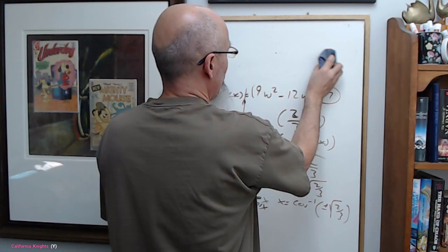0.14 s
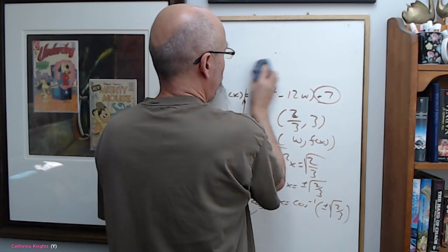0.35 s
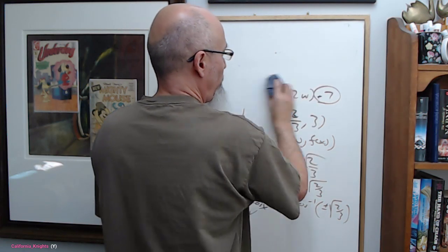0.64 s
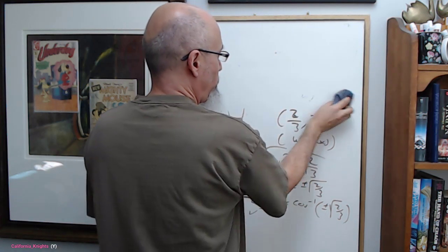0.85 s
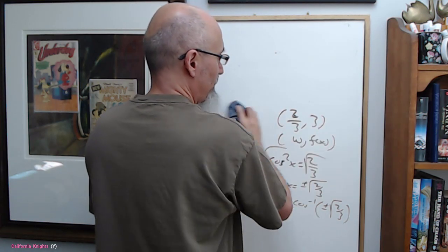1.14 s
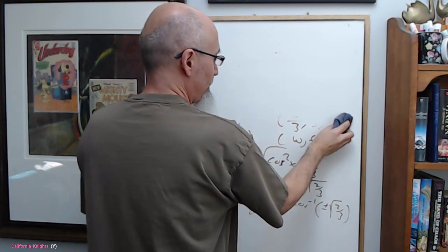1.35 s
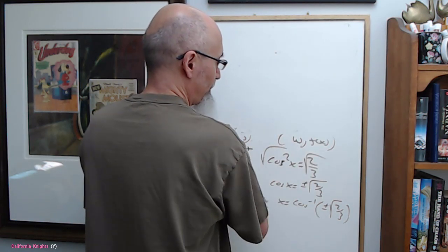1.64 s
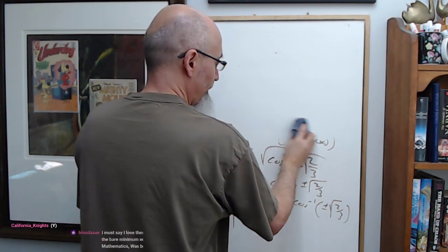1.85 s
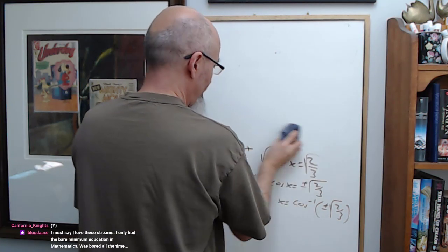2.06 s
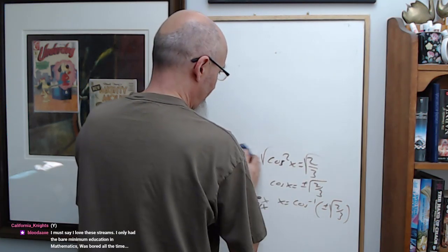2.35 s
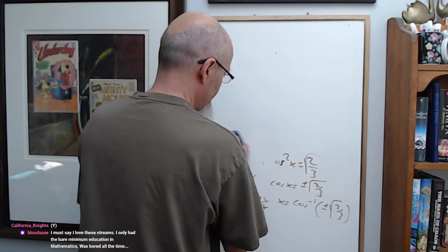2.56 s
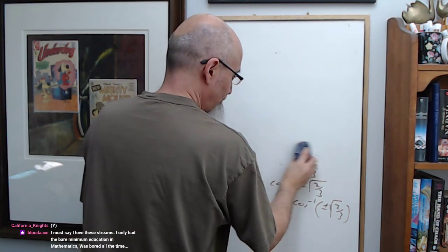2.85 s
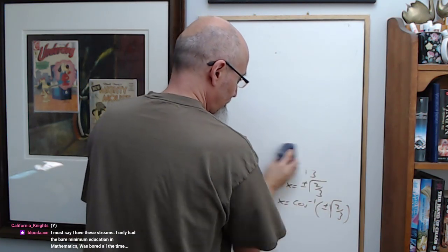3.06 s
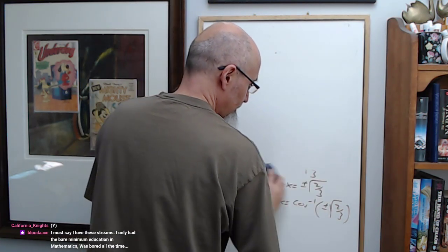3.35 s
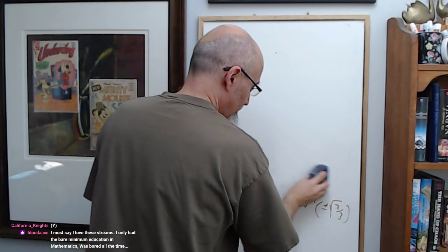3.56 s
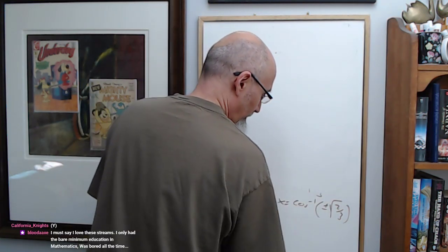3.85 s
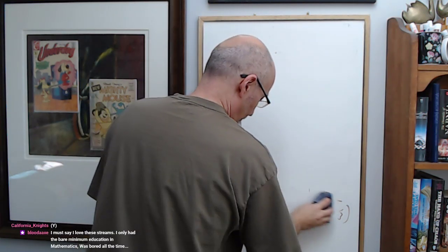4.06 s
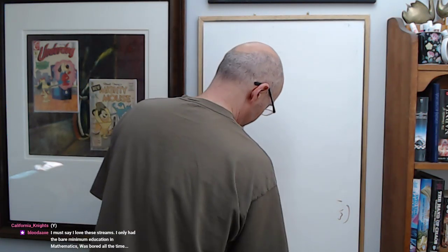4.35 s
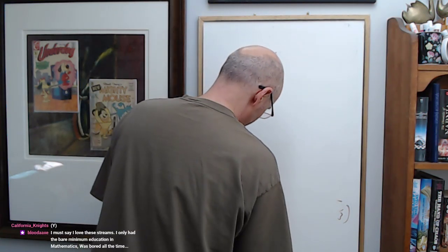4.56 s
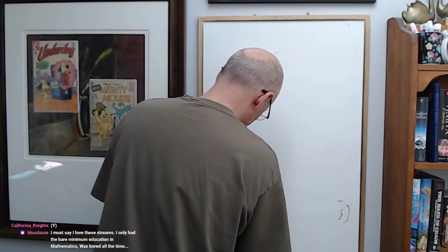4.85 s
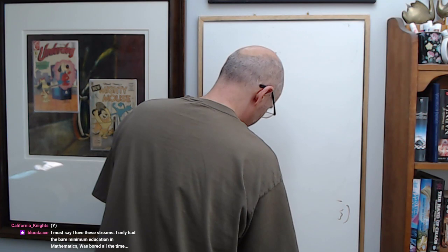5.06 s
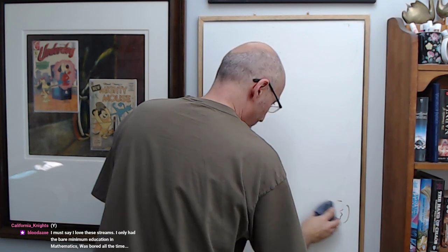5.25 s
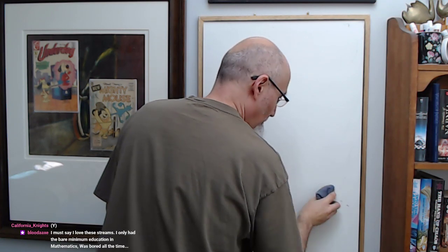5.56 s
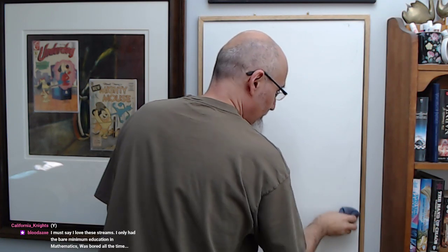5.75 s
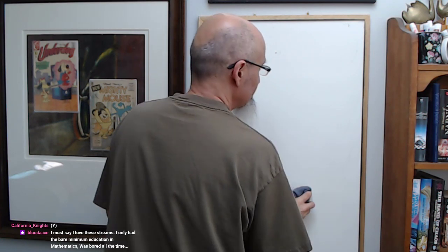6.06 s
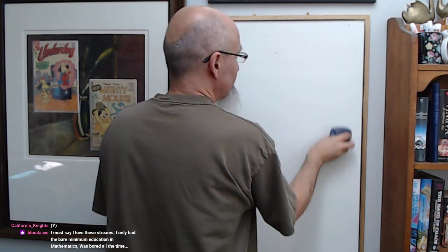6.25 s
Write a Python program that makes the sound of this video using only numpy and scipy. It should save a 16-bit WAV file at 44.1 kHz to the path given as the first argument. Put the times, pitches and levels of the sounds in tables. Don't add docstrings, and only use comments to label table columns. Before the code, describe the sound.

Quick soft wiping strokes hiss over a whiteboard, with hollow board knocks and small ticks, slowing later, while a computer fan blows in a quiet room.

```python
import sys
import numpy as np
from scipy import signal
from scipy.fft import rfft, irfft, next_fast_len
from scipy.io import wavfile
from scipy.ndimage import uniform_filter1d, map_coordinates

SR = 44100
rng = np.random.default_rng(int(sys.argv[2]) if len(sys.argv) > 2 else 0)


def voltage_ratio(level):
    return 10 ** (np.asarray(level, float) / 20)


def output_pcm(signal):
    pcm = np.clip(np.atleast_2d(signal).T, -1, 1) * 32767
    wavfile.write(sys.argv[1], SR, np.round(pcm).astype(np.int16))


N = 282372

# time in seconds, peak in dB, pitch in Hz, t60 in seconds, snap in dB.
TICKS = [
    (.052, -32, 5350, 0.0041, 0),
    (0.6696, -32.5, 5200, 0.0031, 0),
    (1.229, -40, 8140, 0.0036, 6),
    (1.4686, -16.5, 6100, 0.0025, -23),
    (2.796, -31.5, 5810, .005, -11),
    (2.8765, -28.5, 5800, .005, -13),
    (4.0737, -34, 14200, 0.0033, -11),
    (4.0752, -41, 12300, 0.0036, -10),
    (4.5917, -31, 6150, 0.0074, -18),
]
# frequency in Hz, width in Hz, level in dB.
BASS_MODES = [(145, 27, -0.5), (206.4, 67, -6), (106, 35, -9), (307, 102, -7.5)]
# frequency in Hz, width in Hz, level in dB.
BODY_MODES = [(455, 52, 14.5), (356, 60, -18), (544, 26, -4), (655, 155, -3)]
# time in seconds, frequency in Hz.
FLEX = [(0, 140), (.6, 145), (1.3, 146), (1.7, 163.6), (2.2, 147), (2.85, 184), (3.45, 196), (4.1, 160),
        (4.6, 169.5), (5.4, 142), (6.2, 181.6)]
# time in seconds, peak in dB, main mode in Hz, bright dB, flexing dB.
BLOWS = [(.591, -29, 507, -7, -11), (.708, -26.5, 455, -11.5, -11), (.888, -21.5, 440, -10.5, -11),
         (.919, -32.5, 444, -16, -12), (1.165, -29.5, 515, -7.5, -8.5), (1.265, -22.5, 462, -11, -10.5),
         (1.453, -32.5, 476, -26, -13), (1.47, -28, 465, -4.5, -16), (1.708, -25, 526, -4.5, -8.5),
         (1.859, -30.5, 466, -10, -7.5), (1.996, -31.5, 462, -22, -17.5), (2.482, -31.5, 419, -17, -25),
         (2.877, -35.5, 430, -1, -4.5), (2.997, -31.5, 463, -20, -16), (3.293, -33, 455, -11.5, -10.5),
         (3.421, -24.5, 428, -14, -13), (3.443, -32, 426, -14, -28), (3.54, -38, 455, -10, -14),
         (4.53, -37, 468, -4, -9), (4.574, -33.5, 495, -12, -22), (4.593, -33, 546, 0, -11),
         (4.6, -24.5, 491, -19, -23), (6.221, -31.5, 427.6, -19, -13)]
# time in seconds, peak in dB, bright modes in dB, flexing modes in dB.
TAPS = [(.051, -45.5, 2, -12), (0.13, -43.5, -8, -3.5), (.228, -46.5, -12, -11), (.335, -47.5, -18, -5),
        (.669, -43, -7, -14), (.764, -48, -7, -5), (0.854, -47, -8, 1), (1.309, -50, -15, -3.5),
        (1.527, -42, -20, -3.5), (1.977, -47, -12.5, -4), (2.423, -44.5, -24, -23), (2.699, -48, -6, -22),
        (2.798, -43.5, 5, -5.5), (2.975, -42, -5, -9), (4.681, -52, -8, 0), (4.752, -43, -26, -10),
        (5.014, -50, -20, -29), (6.019, -52, 4, -2), (6.177, -47, -7, -15)]
# time in seconds, peak in dB, main mode in Hz, bright dB, flexing dB.
SCUFFS = [(1.484, -31.5, 500, -4.5, -14), (2.867, -35.5, 487, -3, -3), (4.061, -43.5, 474, -1, -5),
          (4.084, -41, 487, -18, -4), (4.102, -41.5, 474, -12, 0), (4.618, -33.5, 453, -5, -7),
          (4.79, -54, 450, -15, 2.5), (5.384, -38, 461, -14, -6.5), (5.43, -39, 454, -12, -6),
          (5.48, -55.5, 455, -15, 5), (5.756, -59, 455, -12, 7.5), (5.985, -57, 520, -6, 6),
          (6.11, -60.5, 455, -8, 4.5)]


def unit(x):
    return x / np.sqrt(np.mean(x ** 2) + 1e-20)


def curves(rows):
    s, *cols = np.transpose(rows)
    return [np.interp(np.arange(N) / SR, s, c) for c in cols]


def wobble(rate):
    return map_coordinates(rng.standard_normal(int(N * rate / SR) + 4), [np.arange(N) * rate / SR])


def filtered(x, response):
    m = next_fast_len(x.shape[-1] + 4096)
    spectrum = rfft(x, m) * response(np.fft.rfftfreq(m, 1 / SR))
    return irfft(spectrum, m)[..., :x.shape[-1]]


def modes(table, stretch=1, blur=1, tilt_db=0):
    extra = np.broadcast_to(tilt_db, len(table))

    def response(f):
        total = 0
        for k, (hz, width, db) in enumerate(table):
            damping = 1j * f * width * blur
            total = total + (-1) ** k * voltage_ratio(db + extra[k]) * damping / ((hz * stretch) ** 2 - f * f + damping)
        return total
    return response


def rush(spectrum, patchy_db):
    z = signal.stft(rng.standard_normal(N), nperseg=512)[2]
    field = uniform_filter1d(uniform_filter1d(rng.standard_normal(z.shape), 6, 0), 8, 1)
    noise = signal.istft(z * voltage_ratio(patchy_db * unit(field)), nperseg=512)[1][:N]
    f, db = np.transpose(spectrum)
    return unit(filtered(noise, lambda hz: voltage_ratio(np.interp(np.log(hz + 1), np.log(f), db, -120, -120))))


def fan_hz():
    centre_hz, swing_hz = 1512, 12
    period_s, first_drop_s, settle_s = 2.68, 0.1676, 0.2808
    half, place = np.divmod(np.arange(N) / SR - first_drop_s, period_s / 2)
    gap = 2 * np.exp(-place / settle_s) / (1 + np.exp(-period_s / 2 / settle_s))
    return centre_hz + swing_hz * (-1) ** half * (gap - 1)


def fan():
    # frequency in Hz, level in dB per Hz.
    airflow = [(35, -31), (60, -3.5), (156, -3.5), (323, -14.5), (448, -9), (579, -4.5), (1040, -3.5),
               (1380, 0), (1600, -1.5), (2000, -3), (3300, -7), (5000, -16), (9000, -25.5), (16000, -30)]
    # order of rotation, rms in dB.
    blade_orders = [(7, -60.5), (8, -65.5)]
    # frequency in Hz, rms in dB.
    case_hum = [(1333, -72)]
    t = np.arange(N) / SR
    rotations = np.cumsum(fan_hz() / 7) / SR
    tones = np.zeros(N)
    for order, db in blade_orders:
        tones += voltage_ratio(db + 3 + 0.42 * wobble(3.96)) * np.sin(2 * np.pi * order * rotations)
    for hz, db in case_hum:
        tones += voltage_ratio(db + 1 + wobble(5.2)) * np.sin(2 * np.pi * hz * t)
    return voltage_ratio(-51.5 + 1.14 * wobble(5.04)) * rush(airflow, patchy_db=1.1) + tones


def ticks():
    out, t = np.zeros(N + SR), np.arange(SR // 20) / SR
    for s, db, hz, t60, snap_db in TICKS:
        grit = rng.standard_normal(len(t))
        ring = np.sin(2 * np.pi * hz * t) * voltage_ratio(-60 * t / t60) * (1 - np.exp(-t / 0.000067))
        snap = voltage_ratio(snap_db - 60 * t / 0.0085) * filtered(grit, modes([(0.72 * hz, hz, 3)]))
        tail = filtered(grit, modes([(hz, 2500, 0)])) * voltage_ratio(-24 - 60 * t / 0.033)
        out[round(s * SR):][:len(t)] += voltage_ratio(db) * (ring / np.abs(ring).max() + snap + tail)
    return out[:N]


def left_over(rows, t60):
    t = np.arange(N) / SR
    return np.sqrt(sum((t > s) * voltage_ratio(2 * (db - 60 * np.abs(t - s) / t60)) for s, db in rows))


def sway():
    free_hz, follows, width_hz = 146, .3, 35
    phase = 2 * np.pi * np.cumsum(free_hz + follows * (curves(FLEX)[0] - free_hz)) / SR
    mode = unit(wobble(width_hz) * np.cos(phase) + wobble(width_hz) * np.sin(phase))
    hits = [(s, db + bass_db - 6) for s, db, *_, bass_db in BLOWS + TAPS + SCUFFS]
    level = left_over(hits, t60=0.44)
    return uniform_filter1d(level, size=500, origin=249) * mode


def contacts():
    taps = [(s, db, 462 + 24 * rng.standard_normal(), *colour) for s, db, *colour in TAPS]
    return [(kind, *row) for kind, rows in enumerate((BLOWS, taps, SCUFFS)) for row in rows]


def pulse(t, at):
    return np.exp(-((t - at) / 0.00016) ** 2)


def knocks():
    # frequency in Hz, width in Hz, level in dB.
    bright_modes = [(754, 78, 0.5), (977, 125, -4.5), (1014, 200, -8.5), (1244, 180, -27)]
    rattle_levels = (-11.5, -6, -18)
    out, t = np.zeros(N + SR), np.arange(SR // 5) / SR
    for kind, s, db, hz, bright_db, bass_db in contacts():
        grit, lumps, spot = rng.standard_normal((3, len(t)))
        soft = kind == 2
        firm = 1 - soft
        blow = 0.21 * pulse(t, 0.00033) + 1.52 * pulse(t, 0.00057 + 1 / hz) + 0.79 * pulse(t, 0.00035 + 2 / hz)
        build = .009 if soft else .003
        crush = (1 if soft else .4) * grit * (t / build) * np.exp(1 - t / build)
        chatter = voltage_ratio(0.74 * unit(uniform_filter1d(lumps, size=300)))
        rattle = grit * voltage_ratio(rattle_levels[kind] - 60 * t / 0.31) * (1 - np.exp(-t / 0.004)) * chatter
        struck_db = 1.7 * spot[:4]
        flex = np.interp(s, *np.transpose(FLEX)) / 145
        hard = 1.25 if min(abs(s - tick[0]) for tick in TICKS) < .004 else 1
        groups = [(BASS_MODES, flex, bass_db + 6.0, pulse(t, 0.0022)),
                  (BODY_MODES, hz / 460, -.1, blow),
                  (bright_modes, hard, bright_db + 0.5, pulse(t, 0.002066))]
        for table, stretch, gain_db, push in groups:
            ring = filtered(firm * 0.78 * push + crush, modes(table, stretch, 0.66, struck_db))
            ring = ring + filtered(rattle, modes(table, stretch, 1.6)) / np.sqrt(1.6)
            if soft and table is BASS_MODES:
                ring = filtered(ring, lambda f: 1 / (1 + 1j * f / 228) ** 4)
            peak = np.abs(ring[:SR // 40]).max()
            out[round((s - .003) * SR):][:len(t)] += voltage_ratio(db + gain_db) * ring / peak
    return out[:N]


def judder():
    return voltage_ratio(2.0 * wobble(30)) * rng.standard_normal(N)


def panel():
    # time in seconds, thud in dB.
    pressure = [(0.0, -72), (0.12, -58), (1.78, -51), (2.41, -64), (2.58, -53), (2.67, -58.5),
                (3.14, -50.5), (3.19, -61), (3.67, -51.5), (4.01, -69), (4.08, -52.5), (4.51, -65),
                (4.65, -51.5), (5.29, -62.5), (5.42, -54), (6.04, -66.5), (6.29, -57), (6.4, -70)]
    # frequency in Hz, level in dB per Hz.
    thud_spectrum = [(12, -32), (18, 8), (30, -1.5), (50, 4), (75, -4.5), (110, 0), (140, -25)]
    thud_db, = curves(pressure)
    push_db = thud_db - thud_db.mean()
    flex = voltage_ratio(-65 + 0.36 * push_db + 2 * wobble(5))
    dragged = voltage_ratio(-58 + 0.1 * push_db + 4.5 * wobble(6.7))
    drone = left_over([(s, db - 19) for s, db, *_ in BLOWS], t60=.5)
    hum = np.hypot(dragged, drone)
    flex = voltage_ratio(-0.74) * flex * unit(filtered(judder(), modes(BASS_MODES)))
    hum = voltage_ratio(-7.5) * hum * unit(filtered(judder(), modes(BODY_MODES, blur=0.94)))
    thud = voltage_ratio(thud_db - 0.4 + 0.98 * wobble(6.5)) * rush(thud_spectrum, patchy_db=-0.5)
    return flex + hum + thud


def felt():
    # time in seconds, fine hiss left at the turn in dB, fine hiss at full speed
    # of the stroke that follows in dB, share of that stroke spent speeding up.
    hand_turns = [(-.08, -63, -52.5, 0.62), (.252, -74, -52, 0.53), (.53, -74, -51.5, 0.51),
                  (.853, -76, -53.5, 0.51), (1.12, -75.5, -51, 0.5), (1.4, -74, -51.5, 0.53),
                  (1.672, -78, -51, 0.55), (2.0, -79, -53, 0.48), (2.3, -67, -52.5, 0.61),
                  (2.49, -75, -55, 0.43), (2.695, -78, -51.5, 0.52), (2.992, -75, -53, 0.54),
                  (3.265, -71, -52, 0.49), (3.535, -74, -52.5, .55), (3.813, -73, -53, 0.47),
                  (4.082, -77, -53.5, 0.46), (4.37, -69, -57, 0.45), (4.555, -72, -57, 0.33),
                  (4.715, -82, -67, 0.52), (4.915, -73, -61, .5), (5.053, -76, -53, 0.49),
                  (5.41, -75, -62, 0.54), (5.582, -82, -60, 0.53), (5.765, -84, -63.5, 0.41),
                  (6.1, -71, -60, 0.44), (6.7, -76, -58, .5)]
    # frequency in Hz, level in dB per Hz.
    fine_spectrum = [(3000, -16), (5000, -4.5), (7000, -1), (8500, 2), (10000, -3.5), (12500, -3.5),
                     (15000, -5.5), (17000, -33)]
    # frequency in Hz, level in dB per Hz.
    coarse_spectrum = [(1500, -25), (2500, -3), (3500, -1), (4600, -0.5), (5500, -1), (7500, -3.5),
                       (9500, -12)]
    turn_s, rest_db, top_db, rise = np.transpose(hand_turns)
    t = np.arange(N) / SR
    place = np.interp(t, turn_s, np.arange(len(hand_turns)))
    stroke, part = place.astype(int), place % 1
    part = part ** (np.log(.5) / np.log(rise[stroke]))
    speed = np.sin(np.pi * part)
    rest_db, top_db = np.interp(t, turn_s, rest_db), top_db[stroke]
    fine = voltage_ratio(top_db) * speed ** 1.24 + voltage_ratio(rest_db)
    shape_db = 0.5 * (2 * part - 1) - 5 * speed ** 4
    coarse_db = -50.5 + 0.39 * (top_db + 55) + shape_db
    coarse = voltage_ratio(coarse_db) * speed ** 0.78 + voltage_ratio(rest_db + 1.5)
    fine, coarse = uniform_filter1d([fine, coarse], size=900)
    flutter_db = 0.44 * wobble(40) + .5 * wobble(200)
    fine_hiss = voltage_ratio(1.0) * fine * rush(fine_spectrum, patchy_db=-1.0)
    coarse_hiss = voltage_ratio(-0.2) * coarse * rush(coarse_spectrum, patchy_db=1.0)
    return voltage_ratio(flutter_db) * (fine_hiss + coarse_hiss)


def scene():
    mono = fan() + ticks() + sway() + knocks() + panel() + felt()
    return np.array([mono, mono])


def noise_fill(mono):
    # frequency in Hz, share of time-frequency cells replaced.
    noise_share = [(4400, .009), (11000, .014), (13500, .035), (15500, .1)]
    shift = 368
    hz, _, z = signal.stft(np.pad(mono, (shift, 0)), SR, "cosine", nperseg=2048)
    band = (np.sqrt(hz) / 6.5).astype(int)
    luck = rng.random((band.max() + 1, z.shape[1]))[band]
    swapped = luck < np.interp(hz, *np.transpose(noise_share), left=-1)[:, None]
    noise = z * np.exp(2j * np.pi * rng.random((2,) + z.shape))
    noise = np.sqrt(1.7) * noise
    stereo = signal.istft(np.where(swapped, noise, z), SR, "cosine", nperseg=2048)[1]
    return stereo[:, shift:][:, :N]


def roll_off(x):
    return signal.sosfilt(signal.butter(12, 16360, fs=SR, output="sos"), x)


def record(dry):
    mono = filtered(dry[0], lambda hz: hz < 15740)
    mix = noise_fill(mono)
    return roll_off(mix)


dry = scene()
out = record(dry)
output_pcm(out)
```